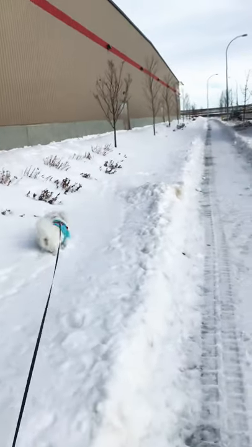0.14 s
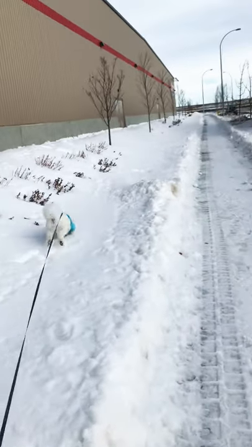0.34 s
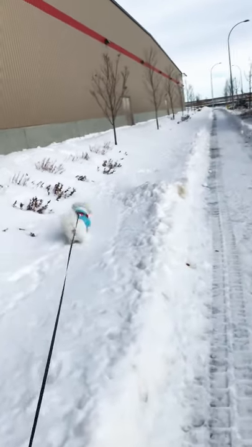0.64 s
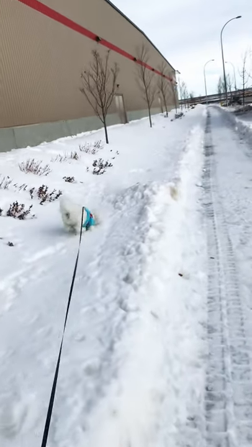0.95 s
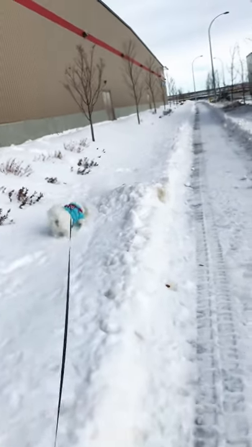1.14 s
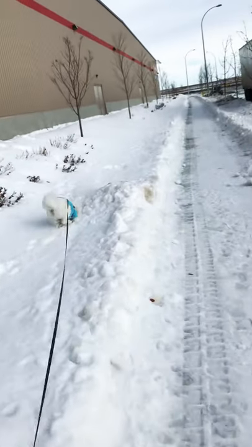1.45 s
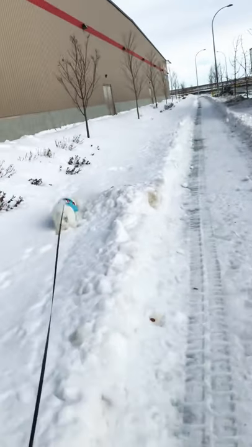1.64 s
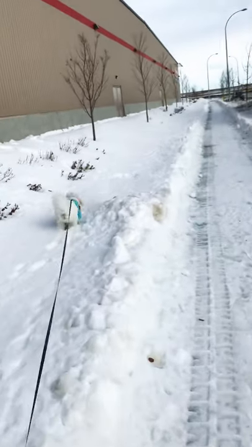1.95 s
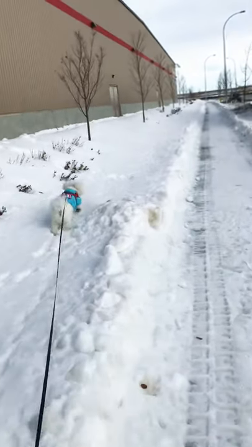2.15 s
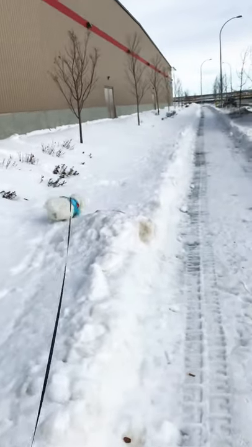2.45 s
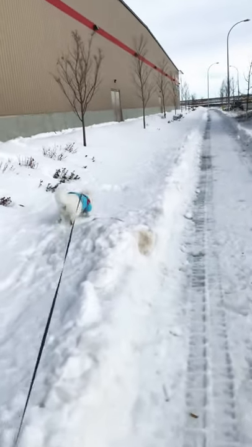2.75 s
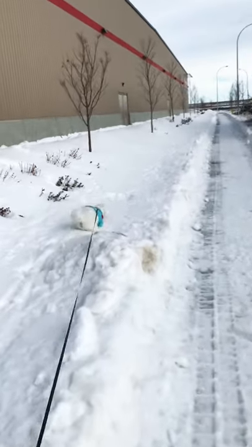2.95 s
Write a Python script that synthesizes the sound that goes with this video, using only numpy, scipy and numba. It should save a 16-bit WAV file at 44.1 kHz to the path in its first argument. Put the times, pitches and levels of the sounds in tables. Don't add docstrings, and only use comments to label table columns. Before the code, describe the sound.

Boots crunch through dry snow while light wind thumps and rumbles against the microphone.

```python
import sys
import numpy as np
from scipy import signal
from scipy.io import wavfile
from scipy.ndimage import uniform_filter1d
from numba import njit

SR = 44100
rng = np.random.default_rng(int(sys.argv[2]) if len(sys.argv) > 2 else 0)


def makeup_ratio(level_db):
    decades = np.asarray(level_db, float) / 20
    return 10 ** decades


def digitize_waveform(pressure):
    field = np.atleast_2d(pressure).T
    bounded = np.clip(field, -1, 1)
    quanta = np.round(bounded * 32767).astype(np.int16)
    wavfile.write(sys.argv[1], SR, quanta)


N = 136710
T = np.arange(N) / SR


def unit(x):
    return x / np.sqrt(np.mean(x ** 2))


def curve(rows):
    times, levels = np.array(rows, float).T
    return np.interp(T, times, levels)


@njit
def svf(x, hz, width):
    y, b, l = np.empty(len(x)), 0., 0.
    g, k = np.tan(np.pi * hz / SR), width / hz
    for i in range(len(x)):
        v = (b + g * (x[i] - l)) / (1 + g * (g + k))
        b, l, y[i] = 2 * v - b, l + 2 * g * v, k * v
    return y


def twice(x, hz, first_width, second_width):
    once = svf(x, float(hz), float(first_width))
    return unit(svf(once, float(hz), float(second_width)))


def band(hz, width):
    return twice(rng.standard_normal(N), hz, width, width)


def walk(rate):
    hold = int(SR / rate)
    steps = np.repeat(rng.standard_normal(N // hold + 1), hold)
    slewed = uniform_filter1d(uniform_filter1d(steps, hold), hold)
    return unit(slewed[:N])


# pitch_hz, density_db (dB per Hz)
TOWN_SPECTRUM = [(88, -30), (150, 5), (206, -13), (287, -3.5), (1070, -4), (1640, -12), (3310, -13.5),
                 (4950, -27), (10000, -28), (13000, -67), (22000, -120)]


def town():
    town_db = -53.5
    out, swell = 0, walk(3.53)
    table_hz, table_db = np.array(TOWN_SPECTRUM, float).T
    for hz in 150 * 2 ** np.arange(0, 6.1, .5):
        density_db = np.interp(np.log(hz), np.log(table_hz), table_db)
        band_db = density_db + 10 * np.log10(hz)
        out = out + makeup_ratio(band_db + .8 * swell + 1.1 * walk(9)) * band(hz, hz * .5)
    return unit(out) * makeup_ratio(town_db)


# time_s, level_db
RUSTLE_LEVEL = [(0, -55.5), (.22, -52.5), (.27, -64), (.33, -58.5), (.6, -59), (.74, -66.5), (.83, -58),
                (1.12, -57), (1.21, -61.5), (1.33, -60), (1.46, -67), (1.8, -67), (1.9, -72), (2.05, -60),
                (2.35, -60.5), (2.6, -68.5), (2.76, -63.5), (3.1, -67)]


def rustle():
    hiss_hz, spill_db = 11400, -9.5
    tick_s, tick_db, tick_hz = 1.727, -48, 11000
    high_pass = signal.butter(6, hiss_hz, "high", fs=SR, output="sos")
    top = unit(signal.sosfilt(high_pass, rng.standard_normal(N)))
    hiss = top + makeup_ratio(spill_db) * band(5200, 6500)
    flicker_db = 1.8 * walk(45) + 1.8 * walk(14)
    tick_fall = (T > tick_s) * np.exp(-np.abs(T - tick_s) / 0.0013)
    tick = makeup_ratio(tick_db) * band(tick_hz, 9000) * tick_fall
    return hiss * makeup_ratio(curve(RUSTLE_LEVEL) + flicker_db) + tick


def eddies(rows, swirl, spread):
    out = np.zeros(N)
    for hz, swirl_db, share in swirl:
        air = band(hz, hz * 0.56)
        power = uniform_filter1d(air ** 2, int(2 * SR / hz))
        air = air / np.sqrt(power + 0.16)
        size = np.zeros(N)
        for centre, length, db in rows:
            swell_s = max(length, .008) * share * spread
            size += makeup_ratio(db) / np.cosh(np.clip((T - centre) / swell_s, -30, 30))
        out += makeup_ratio(swirl_db) * air * size
    return out


# centre_s, length_s, level_db
SLOW_EDDIES = [(0.26, 0.019, -31), (0.345, 0.024, -22), (0.6, 0.06, -32.5), (0.97, 0.038, -32.5),
               (1.8, 0.03, -40), (0.477, 0.14, -24), (0.737, 0.023, -35), (0.827, 0.048, -26.5),
               (0.916, 0.053, -32.5), (1.112, 0.03, -24), (1.195, 0.017, -24), (1.464, 0.27, -30),
               (1.547, 0.027, -39), (1.689, 0.017, -27.5), (1.749, 0.022, -32), (1.908, 0.068, -37),
               (2.238, 0.026, -27.5), (2.308, 0.013, -22.5), (2.463, 0.02, -37), (2.582, 0.073, -29),
               (2.71, 0.081, -31), (2.829, 0.06, -39)]
# centre_s, length_s, level_db
QUICK_EDDIES = [(0.24, 0.047, -20), (0.33, 0.021, -26), (0.428, 0.034, -19.5), (0.5, 0.024, -26),
                (0.571, 0.036, -23), (0.626, 0.019, -32), (0.782, 0.014, -29), (0.922, 0.035, -27),
                (1.114, 0.014, -32), (1.139, 0.024, -22.5), (1.192, 0.059, -35.5), (1.378, 0.013, -22.5),
                (1.4, 0.037, -23), (1.435, 0.026, -30), (1.462, 0.023, -32.5), (1.54, 0.012, -33.5),
                (1.642, 0.02, -36), (2.247, 0.023, -37.5), (2.308, 0.017, -26), (2.366, 0.015, -28.5),
                (2.575, 0.05, -36), (2.51, 0.015, -40), (1.32, 0.026, -30.5), (1.222, 0.014, -36),
                (2.188, 0.017, -36.5), (2.4, 0.03, -39), (2.8, 0.028, -36), (0.88, 0.022, -35.5),
                (0.4, 0.016, -31.5), (2.649, 0.025, -35), (2.706, 0.026, -25.5), (2.731, 0.007, -30),
                (2.76, 0.042, -32)]
# pitch_hz, level_db, length_share (of the eddy's length)
SLOW_SWIRLS = [(48.5, -5.5, 1.56), (76.6, -3, 1.01), (112, -11, 0.79)]
# pitch_hz, level_db, length_share (of the eddy's length)
QUICK_SWIRLS = [(146.6, -5, 1.33), (225.8, -7, 0.98), (367, -13.5, 0.46), (547, -14.5, 0.17),
                (726, -39, 0.62), (1150, -49, 0.45)]
# time_s, level_db
GUST_LEVEL = [(0, -43.5), (.17, -44), (.3, -38), (.95, -33.5), (1.05, -49), (1.15, -37), (1.6, -39.5),
              (2.05, -46.5), (2.3, -31), (2.5, -40.5), (2.7, -25.5), (2.88, -39.5), (3.1, -40.5)]


def wind():
    low = band(67.2, 46) * makeup_ratio(0.96 * walk(12))
    high = band(167.7, 104) * makeup_ratio(-11.5 + 2.6 * walk(25.13))
    rumble = low * makeup_ratio(curve(GUST_LEVEL) - 7) + high * makeup_ratio(curve(GUST_LEVEL) - 7)
    slow = eddies(SLOW_EDDIES, SLOW_SWIRLS, spread=0.34)
    quick = eddies(QUICK_EDDIES, QUICK_SWIRLS, spread=0.27)
    return slow + quick + rumble


# centre_s, peak_db, pitch_hz (minus = pushes first)
AIR_FLICKS = [(.2485, -17, 428), (.4325, -11.5, -230), (0.5, -25.5, 520), (.429, -21.5, 560),
              (1.137, -21, 540), (2.366, -17, -190), (2.306, -20, -170), (1.377, -17, 258),
              (1.392, -15.5, 228), (1.415, -15.5, 250), (1.464, -17.5, 138)]


def flicks():
    out, cycles = np.zeros(N), 0.52
    for centre, db, hz in AIR_FLICKS:
        t = T - centre
        out += makeup_ratio(db) * np.sin(2 * np.pi * hz * t) * np.exp(-(t * hz / cycles) ** 2)
    return out


# start_s, peak_db, top_db (share above 6 kHz)
ICE_SPLINTERS = [(0.0797, -33, -10), (0.3027, -33, -23), (0.3428, -32.5, -19), (0.366, -37, -18),
                 (0.4474, -39.5, -20), (0.4707, -40, -21), (0.549, -44, -11), (0.5611, -41, -10),
                 (0.589, -41, -6), (0.607, -37.5, -19), (0.9171, -33.5, -16), (0.9413, -39, -14),
                 (0.9627, -33, -17), (1.0101, -40, -18), (1.0321, -27, -17), (1.0725, -36, -18),
                 (1.5272, -46, -18), (1.5479, -39, -21), (1.5627, -32, -28), (1.9535, -50, -13),
                 (1.9959, -41.5, -20), (2.069, -38, -16), (2.0892, -36, -16), (2.111, -34, -18),
                 (2.144, -29, -20), (2.2028, -44, -16), (2.2148, -40, -22), (2.2897, -44, -16),
                 (2.363, -41, -15), (2.4297, -43, -10), (2.5113, -38.5, -13), (2.6507, -42, -9),
                 (2.6843, -44, -5), (2.7018, -35.5, -14), (2.718, -31, -22), (2.8377, -44.5, -24),
                 (2.8646, -47, -25), (2.8908, -49, -18), (2.927, -47, -15), (3.054, -43.5, -16)]


def splinters():
    level_db, top_trim_db, rise_s, fall_s = -4, 1.5, 0.00072, .0017
    out, t = np.zeros(N + 1024), np.arange(1024) / SR
    shape = (1 - np.exp(-t / rise_s)) * np.exp(-t / fall_s)
    puffs = rng.standard_normal((len(ICE_SPLINTERS), 2, 1024))
    for (start, db, top_db), puff in zip(ICE_SPLINTERS, puffs):
        i = int(start * SR)
        hz = 3700 * 1.32 ** puff[0, 0]
        low = twice(puff[0], hz, 0.49 * hz, 1.03 * hz)
        top = unit(svf(svf(puff[1], 8900., 6000.), 8500., 9000.))
        fizz = low + makeup_ratio(top_db + top_trim_db) * top
        out[i:i + 1024] += makeup_ratio(db + level_db) * shape * fizz
    return out[:N]


# start_s, peak_db, pitch_hz
LOW_CRACKS = [(0.2836, -26.5, 905), (0.3661, -33, 1170), (0.4479, -29, 1060), (0.4788, -25, 890),
              (0.5048, -30.5, 1020), (0.6464, -33, 1260), (0.9857, -33, 1430), (1.0101, -27, 1030),
              (1.0321, -21, 1170), (1.035, -20.5, 1050), (1.0385, -25.5, 1010), (1.0478, -21, 1030),
              (1.0525, -23, 1100), (1.0672, -30, 900), (1.073, -20, 1150), (1.0914, -27.5, 920),
              (1.3309, -26.5, 1120), (1.6381, -33.5, 1000), (2.0698, -27.5, 870), (2.0735, -28, 700),
              (2.1075, -16.5, 820), (2.1115, -24, 600), (2.1465, -26, 695), (2.2085, -25.5, 640),
              (2.7185, -27, 900), (2.728, -25.5, 850), (2.1427, -22.5, 935), (2.165, -25, 1210),
              (2.1822, -29, 1210), (2.2046, -21.5, 1260), (2.2909, -24.5, 1050), (2.3198, -32.5, 1230),
              (2.5129, -30, 1170), (2.7026, -18.5, 835), (2.802, -29, 1040), (2.8928, -26, 1170),
              (2.99, -33.5, 765)]
# start_s, peak_db, pitch_hz
HIGH_CRACKS = [(0.0804, -29, 1980), (0.3035, -26.5, 1940), (0.3437, -22.5, 1656), (0.9175, -27, 2400),
               (0.9418, -34, 3520), (0.9634, -29, 2130), (1.5274, -37, 4030), (1.5642, -24.5, 2300),
               (1.571, -25, 700), (1.592, -29, 995), (2.742, -35.5, 4200), (1.9954, -32.5, 3230),
               (2.2162, -42, 3260), (2.4303, -35.5, 1920), (2.6508, -38, 1550), (2.7182, -28.5, 3380),
               (2.838, -30, 1470), (2.865, -31.5, 2640), (2.9273, -28.5, 1480)]


def cracks():
    level_db, ring_cycles, grit_db, grit_s = -4.5, 1.5, -13, 0.0013
    out, t = np.zeros(N + 1024), np.arange(1024) / SR
    thud = 0.53 * np.sin(2 * np.pi * 380 * t) * np.exp(-t / 0.0015)
    grit_shape = t / grit_s * np.exp(1 - t / grit_s)
    rows = list(LOW_CRACKS) + list(HIGH_CRACKS)
    for (start, db, hz), puff in zip(rows, rng.standard_normal((len(rows), 1024))):
        i = int(start * SR)
        ring_shape = np.exp(-t * hz / ring_cycles) * np.minimum(t * hz * 3, 1)
        ring = 1.63 * np.sin(2 * np.pi * hz * t) * ring_shape
        grit = twice(puff, hz, .6 * hz, hz) * grit_shape
        out[i:i + 1024] += makeup_ratio(db + level_db) * (ring + thud + makeup_ratio(grit_db) * grit)
    return out[:N]


def lumps(rows, grains_per_s, q):
    out = 0
    for hz, db in rows:
        falls = rng.random(N) < grains_per_s / SR
        size = makeup_ratio(4.5 * np.minimum(rng.exponential(size=N), 2))
        hits = falls * size * rng.standard_normal(N)
        out = out + makeup_ratio(db) * twice(hits, hz, hz * q, 2 * hz)
    return out


# start_s, length_s,
# level_db, fine_db (share of fine grains)
SOLE_CRUSH = [(0.295, 0.09, -62, 3), (0.452, 0.045, -48, -2), (0.518, 0.13, -63.5, -1),
              (0.909, 0.019, -52.5, 1), (0.927, 0.08, -53, -2), (1.005, 0.029, -43.5, -10),
              (1.027, 0.028, -38.5, -9), (1.048, 0.053, -46.5, -14), (1.211, 0.13, -73, 11.5),
              (1.346, 0.017, -57, -14.5), (1.527, 0.035, -63.5, 5), (1.547, 0.075, -46, -5),
              (1.59, 0.065, -51, -16), (1.778, 0.053, -70.5, 4), (1.941, 0.026, -66, 4),
              (1.989, 0.05, -69, 8), (2.064, 0.036, -49.5, -7.5), (2.093, 0.024, -37, -19),
              (2.112, 0.047, -43.5, -10), (2.204, 0.0099, -38.5, -39), (2.31, 0.094, -66.5, -1),
              (2.69, 0.064, -45.5, -10), (2.756, 0.036, -60, -11)]
# pitch_hz, level_db
COARSE_LUMPS = [(350, -5), (700, 0.5), (1120, 1), (1750, -10)]
# pitch_hz, level_db
FINE_GRAINS = [(2600, -0.5), (3800, -0.5), (6000, -6), (9000, -12), (13500, -15.5)]


def crush():
    load, fine_load = np.zeros(N), np.zeros(N)
    for start, length, db, fine_db in SOLE_CRUSH:
        shape = np.sin(np.pi * np.clip((T - start) / length, 0, 1)) ** 1.1
        load += makeup_ratio(db) * shape
        fine_load += makeup_ratio(db + fine_db) * shape
    clumps = makeup_ratio(2.6 * walk(200) + 2.2 * walk(70))
    coarse = lumps(COARSE_LUMPS, grains_per_s=660, q=0.26)
    fine = lumps(FINE_GRAINS, grains_per_s=4500, q=0.27)
    return (load * coarse + fine_load * fine) * clumps


def scene():
    background = town() + rustle()
    port = wind() + flicks()
    snow = splinters() + cracks() + crush()
    return (background + port + snow)[None]


def low_pass(x):
    return signal.sosfilt(signal.butter(12, 15830, fs=SR, output="sos"), x)


def record(dry):
    bass_cut = signal.butter(2, 38, "high", fs=SR, output="sos")
    top_cut = signal.ellip(10, .2, 80, 15850, fs=SR, output="sos")
    trimmed = signal.sosfilt(top_cut, signal.sosfilt(bass_cut, dry))
    mix = .4 * np.tanh(trimmed / .4)
    return low_pass(mix)


dry = scene()
out = record(dry)
digitize_waveform(out)
```